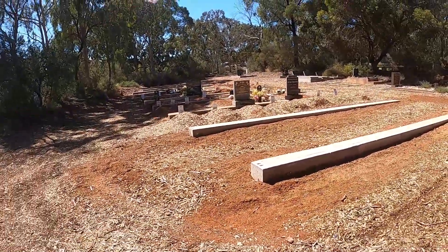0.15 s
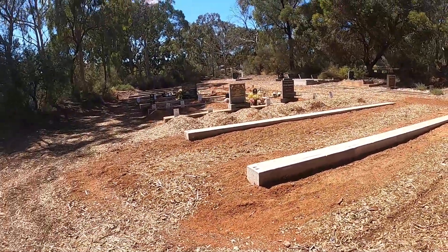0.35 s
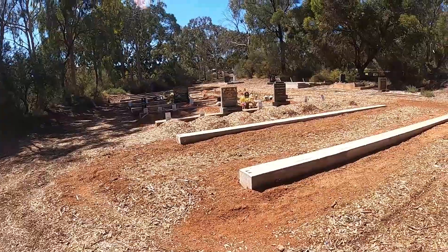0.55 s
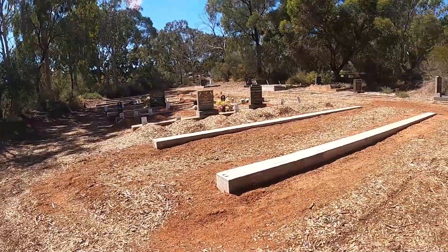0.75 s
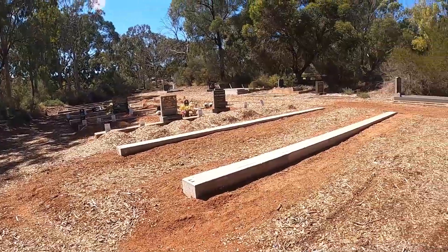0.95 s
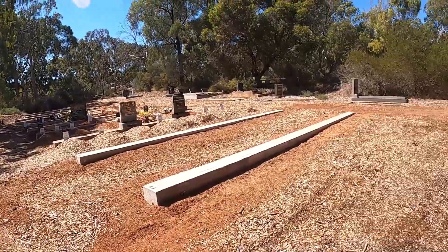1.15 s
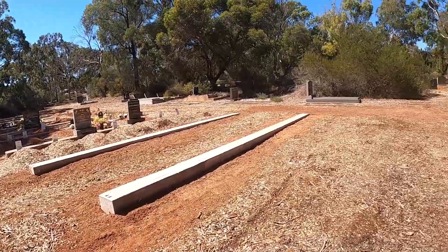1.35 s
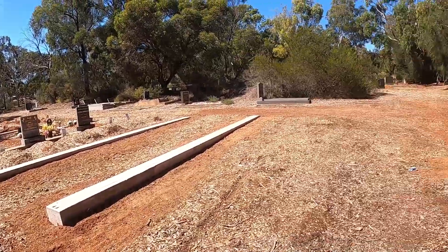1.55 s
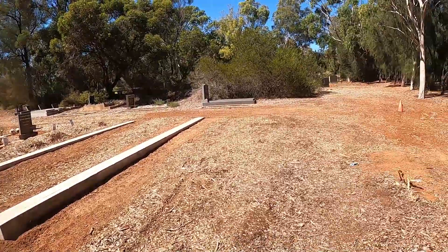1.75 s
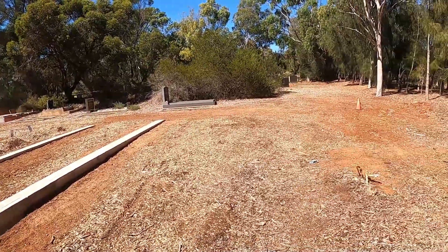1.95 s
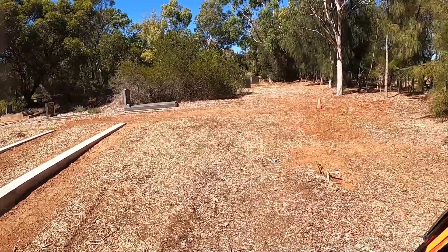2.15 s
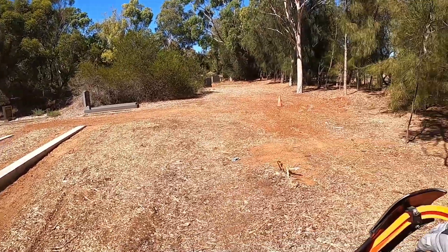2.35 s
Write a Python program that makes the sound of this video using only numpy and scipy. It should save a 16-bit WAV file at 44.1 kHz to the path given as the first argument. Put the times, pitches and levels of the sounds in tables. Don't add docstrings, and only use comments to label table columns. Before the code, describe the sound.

Steady motorcycle idle throughout, already running at the start: hollow pipe thumps, airy gulps, metallic clatter and low frame rumble, heard in mono in an open dry clearing, the engine clatter growing clearer as the wearer turns toward it.

```python
import sys
import numpy as np
from scipy import signal
from scipy.fft import rfft, irfft, next_fast_len
from scipy.io import wavfile
from scipy.ndimage import map_coordinates

SR = 44100
rng = np.random.default_rng(int(sys.argv[2]) if len(sys.argv) > 2 else 0)


def elevation(decibels):
    levels = np.asarray(decibels, float)
    return 10 ** (levels / 20)


def store_pcm(level_fs):
    pcm = np.round(np.clip(level_fs, -1, 1) * 32767).astype(np.int16)
    wavfile.write(sys.argv[1], SR, np.atleast_2d(pcm).T)


N = 110250
LEAD = 8192
TOTAL = N + LEAD


def unit(x):
    return x / np.sqrt(np.mean(x ** 2) + 1e-20)


def noise():
    return rng.standard_normal(TOTAL)


def curve(rows):
    seconds = (np.arange(TOTAL) - LEAD) / SR
    return np.interp(seconds, *np.transpose(rows))


def filtered(x, response):
    size = next_fast_len(len(x) + 8192)
    spectrum = rfft(x, size) * response(np.fft.rfftfreq(size, 1 / SR))
    return irfft(spectrum, size)[:len(x)]


def ring(hz, width_hz):
    return lambda f: 1j * f * width_hz / (hz * hz - f * f + 1j * f * width_hz)


def double_ring(hz, width_hz):
    return lambda f: ring(hz, width_hz)(f) * ring(hz, 2 * width_hz)(f)


def between(toward_pipe, toward_engine):
    # time in seconds, aim (0 = toward the pipe, 1 = toward the engine).
    head_turn = [(0, 0), (.8, 0.037), (1.3, 0.17), (1.6, 0.26), (1.9, 0.87), (2.2, 1), (2.5, 1)]
    return toward_pipe + (toward_engine - toward_pipe) * np.clip(curve(head_turn), 0, 1.2)


def moments(share):
    # time in seconds, firing rate in blows per second; the idle hunts a little.
    idle_speed = [(0.0, 15.357), (0.247, 14.534), (0.273, 15.065), (0.554, 15.512), (0.578, 14.776),
                  (0.761, 14.907), (0.894, 15.621), (1.006, 15.118), (1.08, 15.23), (1.352, 14.563),
                  (1.482, 14.774), (1.708, 15.276), (1.788, 14.228), (1.912, 14.579), (2.007, 14.766),
                  (2.188, 15.635), (2.371, 14.892), (2.5, 15.513)]
    cycles = np.cumsum(curve(idle_speed)) / SR
    start_share = .35
    cycles = cycles - cycles[LEAD] + start_share - share
    return np.flatnonzero(np.diff(np.floor(cycles))) + 1


def bursts(share, rise_s, t60_s, scatter_db, jitter_s):
    luck = rng.standard_normal((64, 2))
    at = moments(share)
    jitter = np.round(luck[:len(at), 0] * jitter_s * SR).astype(int)
    at = np.clip(at + jitter, 0, TOTAL - 1)
    strikes = np.bincount(at, elevation(scatter_db * luck[:len(at), 1]), TOTAL)
    t = np.arange(SR // 10) / SR
    shape = (1 - np.exp(-t / rise_s)) * elevation(-60 * t / t60_s)
    return signal.fftconvolve(strikes, shape / shape.max())[:TOTAL]


def exhaust():
    # mode in Hz, t60 in seconds, signed size toward the pipe, signed size toward the engine.
    pipe_modes = [(31.1, 0.333, -0.01, -0.011), (47.7, 0.29, 0.117, 0.131), (70.0, 0.089, -0.319, -0.363),
                  (118.2, 0.087, -0.291, -0.192), (134.1, 0.117, 0.475, 0.327),
                  (188.2, 0.093, 0.146, 0.037), (217.7, 0.062, 0.36, 0.291), (237.8, 0.037, -0.051, 0.277),
                  (417.2, 0.049, -0.089, 0.036), (527.6, 0.091, -0.015, -0.004)]
    return_modes = [(160.7, 0.15, 0.016, 0.021), (325.5, 0.048, -0.043, 0.085),
                    (373.1, 0.055, 0.052, -0.018), (422.5, 0.025, 0.016, 0.052)]
    blow = struck(pipe_modes, delay_s=0, rise_s=.00157)
    return blow + struck(return_modes, delay_s=.0079, rise_s=.001)


def struck(modes, delay_s, rise_s):
    blow_scatter_db, mode_scatter_db, tune_scatter = -0.48, 0.34, 0.0087
    out = np.zeros(TOTAL + SR)
    t = np.arange(SR // 4) / SR
    hz, t60, away, near = np.transpose(modes)[:, :, None]
    turn = between(0, 1)
    for at in moments(0):
        luck = rng.standard_normal((3, len(modes), 1))
        size = away + (near - away) * turn[at]
        size = size * elevation(blow_scatter_db * luck[0, 0] + mode_scatter_db * luck[1])
        tuned_hz = hz * (1 + tune_scatter * luck[2])
        rings = size * elevation(-60 * t / t60) * np.sin(2 * np.pi * tuned_hz * t)
        start = at + round(delay_s * SR)
        out[start:][:len(t)] += rings.sum(axis=0) * (1 - np.exp(-t / rise_s))
    return out[:TOTAL]


def intake():
    # resonance in Hz, width in Hz, level in dB toward the pipe, level in dB toward the engine.
    airbox = [(313.6, 65, -40.5, -42.5), (394, 110, -42.5, -46.5), (571.5, 79, -44.5, -43),
              (946, 123, -43.5, -52.5), (1108, 180, -51, -47.5)]
    # share of the cycle, level in dB of the inlet pressure snap.
    inlet_snaps = [
        (.792, 13.57),
        (.85, 13.3),
    ]
    scatter_db = 1.5
    gulp = bursts(.79, rise_s=0.00077, t60_s=0.095, scatter_db=scatter_db, jitter_s=0.00063)
    air = (gulp + elevation(-8.5)) * noise()
    snaps = np.zeros(TOTAL)
    for share, db in inlet_snaps:
        snaps -= elevation(db) * bursts(share, .0001, 0.0009, scatter_db, jitter_s=0.00034)
    out = np.zeros(TOTAL)
    for hz, width, away_db, near_db in airbox:
        rung = filtered(air, double_ring(hz, width))
        rung = rung + filtered(snaps, double_ring(hz, 0.78 * width))
        out += elevation(between(away_db, near_db)) * rung * np.sqrt(SR / width / 2)
    return out


def valves():
    # share of the cycle after the blow, ring in Hz, width in Hz,
    # level in dB over the whirr toward the pipe, the same toward the engine.
    ticks = [(.02, 9600, 5000, 9, -5.5), (0.151, 2750, 2040, 6.5, 0), (.13, 588, 121.6, 4.5, 3.5),
             (.16, 391, 100, 12.5, 7.5), (.15, 8700, 5050, 10, -5), (.28, 1430, 915, 0, -3),
             (.3, 9320, 6250, 5, 9), (.31, 5260, 2030, -2.5, 7.5), (.58, 8850, 6160, -2, 3.5),
             (.6, 3600, 810, 9.5, 10), (.62, 950, 300, -0.5, -3), (.84, 5000, 1610, 7, 9),
             (.85, 2300, 2300, 4, 4.5), (0.11, 310, 85, 13, 11), (0.44, 935, 200, 1, -1)]
    out = np.zeros(TOTAL)
    for share, hz, width, away_db, near_db in ticks:
        knock = bursts(share, rise_s=.0012, t60_s=0.048, scatter_db=1.3, jitter_s=0.0016) * noise()
        out += elevation(between(away_db, near_db)) * filtered(knock, double_ring(hz, width))
    return out


def whirr():
    # frequency in Hz, level in dB per Hz, heard toward the pipe.
    whirr_away = [(280, -22), (520, -6.5), (950, -15.5), (1600, -21), (3700, -31.5), (5900, -45),
                  (11200, -55), (15300, -73)]
    whirr_near = [(280, -23.5), (520, -14.5), (1390, -18.5), (3600, -28.5), (4400, -36), (7000, -45.5),
                  (11200, -56), (15300, -70.5)]
    # case resonance in Hz, width in Hz, lift in dB toward the pipe, lift in dB toward the engine.
    case_rings = [(637, 89, -1, 2), (705, 114, -15, -9), (953, 370, 6.5, 2), (1408, 120, 1, 9.5),
                  (2595, 120, 4, 2), (3340, 1200, 2, 5.5), (4880, 300, 5.5, 2), (5370, 200, 5.5, 7),
                  (6070, 250, 5, 6.5), (8350, 490, 5.5, 1), (9800, 600, 6.5, 1), (12500, 1800, 6.5, 4)]
    rattle_db, rattle_per_s = 1.5, 260
    knots = rng.standard_normal(int(3 * rattle_per_s) + 9)
    flutter = map_coordinates(knots, [np.arange(TOTAL) * rattle_per_s / SR])
    rattle = elevation(rattle_db * flutter) * noise() + valves()

    def through_case(spectrum, column):
        hz, db = np.transpose(spectrum)

        def response(f):
            lift_db = sum(row[column] * np.abs(ring(row[0], row[1])(f)) ** 2 for row in case_rings)
            return elevation(np.interp(np.log(f + 1), np.log(hz), db) + lift_db)
        return unit(filtered(rattle, response))

    turn = np.clip(between(0, 0.94), 0, 1) ** 1.45
    away = elevation(-38.5) * through_case(whirr_away, column=2)
    near = elevation(-35.5) * through_case(whirr_near, column=3)
    return (1 - turn) * away + turn * near


def frame_shudder():
    return elevation(-37) * unit(filtered(noise(), lambda f: ring(126, 150)(f) ** 2))


def scene():
    machine = exhaust() + intake() + whirr() + frame_shudder()
    return machine[None, LEAD:]


def top_cut(x):
    return signal.sosfilt(signal.butter(12, 15720, fs=SR, output="sos"), x)


def record(dry):
    return top_cut(dry)


dry = scene()
out = record(dry)
store_pcm(out)
```